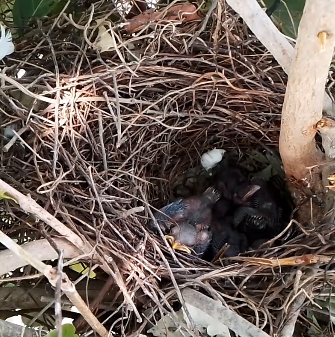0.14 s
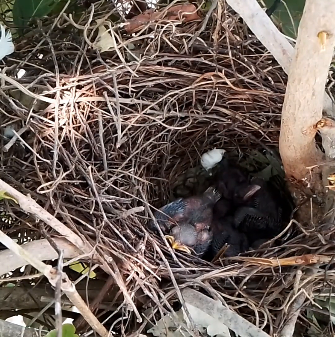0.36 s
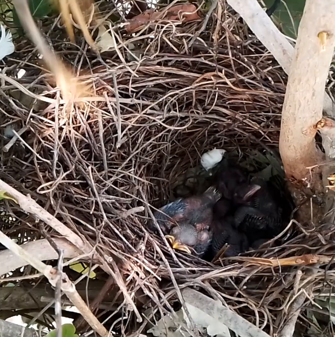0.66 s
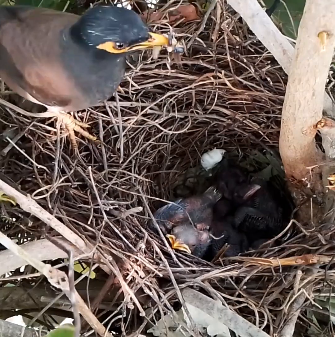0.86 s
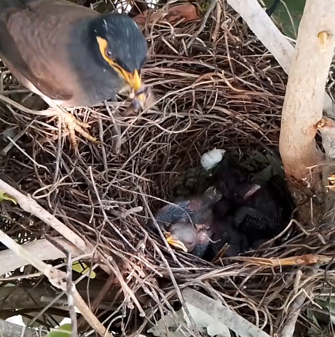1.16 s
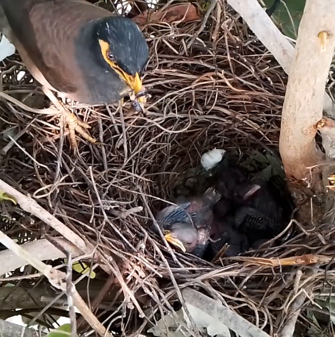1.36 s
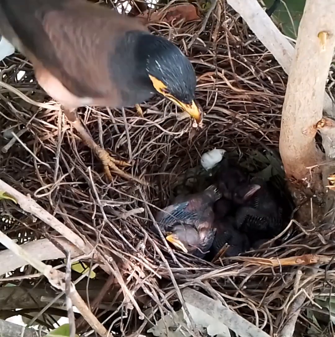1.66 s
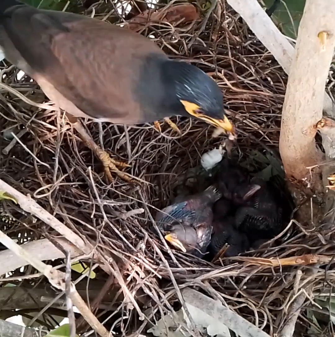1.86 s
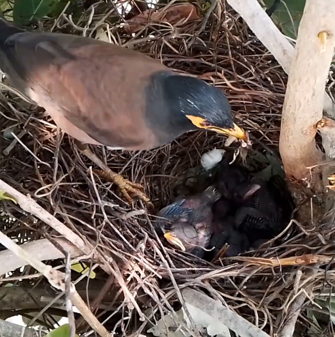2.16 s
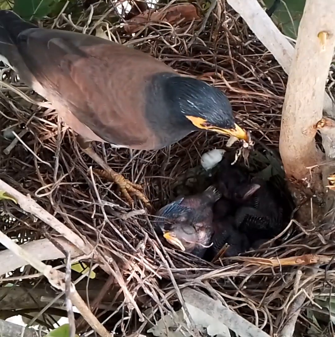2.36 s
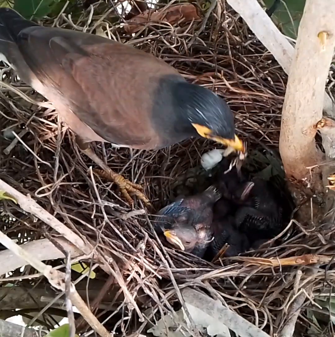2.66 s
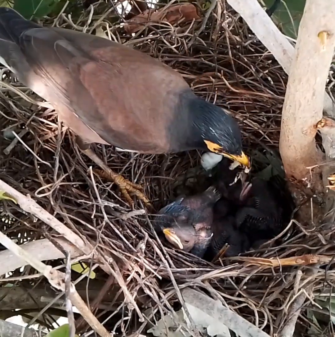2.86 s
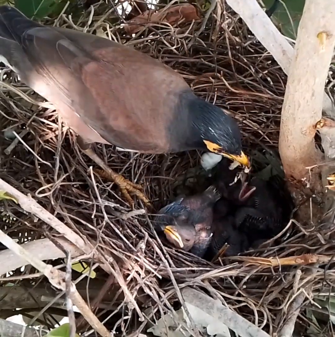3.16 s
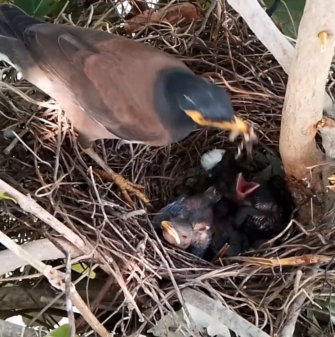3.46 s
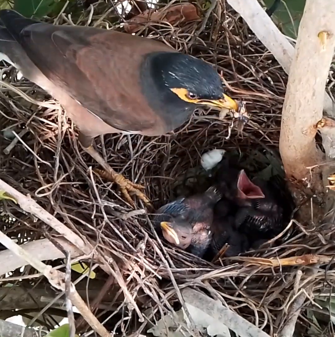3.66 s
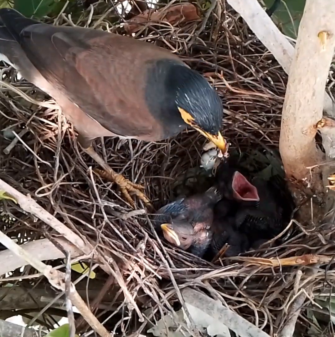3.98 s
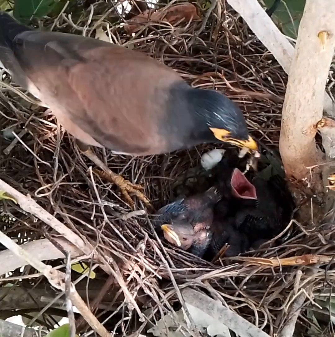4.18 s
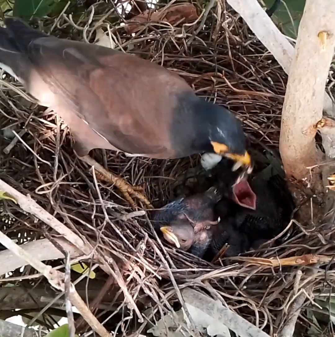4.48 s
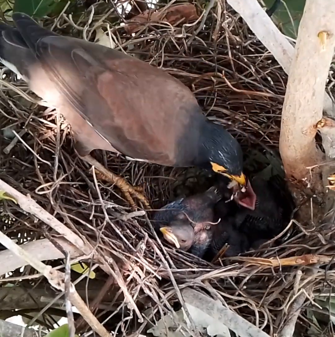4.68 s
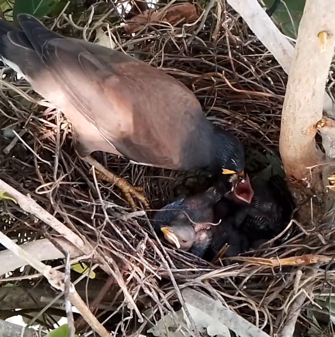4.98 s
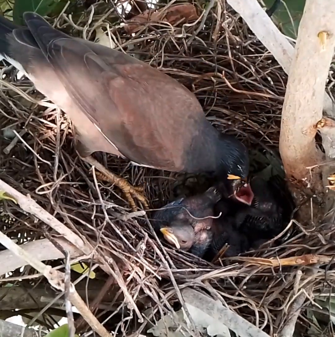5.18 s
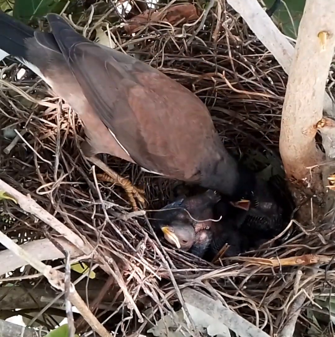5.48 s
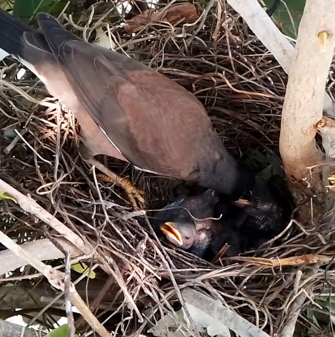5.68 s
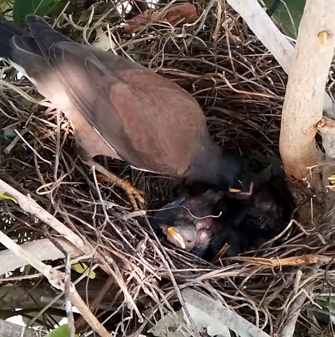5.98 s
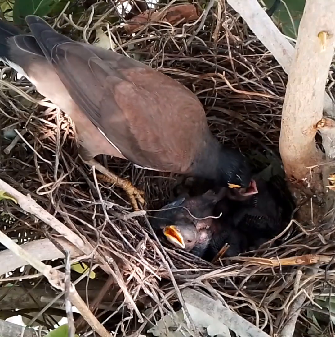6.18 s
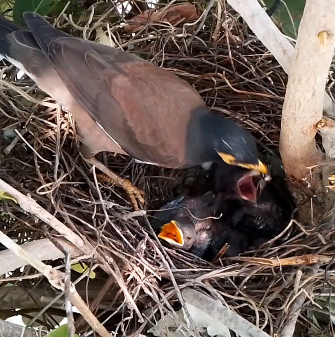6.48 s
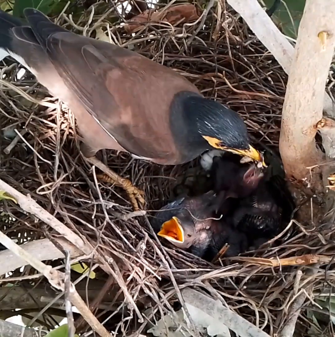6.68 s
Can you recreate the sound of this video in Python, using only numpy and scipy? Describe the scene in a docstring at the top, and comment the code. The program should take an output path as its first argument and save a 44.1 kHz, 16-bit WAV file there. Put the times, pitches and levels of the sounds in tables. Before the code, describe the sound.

Harsh bird squawks and a short whine, quick high peeps, then loud raspy begging from chicks in a twig nest over quiet outdoor air.

```python
"""A low churr dies away and a twig knocks as a myna lands on its nest with food; falling squawks follow.
Nestlings peep in twin falling whistles and beg in rasps: uneven pulses ringing a moving throat resonance.
Adults whine in harmonics and chip in down-sweeps. Twigs ring damped modes and brush in bursts of noise.
A rooster crows faintly, as harmonics through a throat, over a wash of coloured noise."""
import sys
import numpy as np
from scipy import signal
from scipy.fft import rfft, irfft, next_fast_len
from scipy.io import wavfile
from scipy.ndimage import uniform_filter1d

SR = 44100
rng = np.random.default_rng(int(sys.argv[2]) if len(sys.argv) > 2 else 0)


def transcribe(u):
    """Save the signal u as a 16-bit wav file named by the first command-line argument.

    u: samples, shape (n,) or (channels, n), limited to [-1, 1]; the rate is SR.
    q: integer samples, one column per channel.
    """
    v = np.clip(np.atleast_2d(u).T, -1, 1)
    q = np.round(v * 32767).astype(np.int16)
    wavfile.write(sys.argv[1], SR, q)


N = 301203
TIME = np.arange(N) / SR


def from_db(db):
    """Amplitude ratio of a level in dB."""
    return 10 ** (np.asarray(db) / 20)


def rms_one(x):
    """Scale to unit RMS."""
    return x / np.sqrt(np.mean(np.abs(x) ** 2) + 1e-20)


def at_hz(points, hz):
    """Gain of a spectrum table at any frequency, interpolated in dB over log frequency."""
    f, db = np.transpose(points)
    return from_db(np.interp(np.log(hz + 1), np.log(f), db))


def colour(x, points, skirt_db=30):
    """Filter by a spectrum table that falls by skirt_db an octave beyond its ends."""
    low_hz, low_db = points[0]
    high_hz, high_db = points[-1]
    closed = [(low_hz / 2, low_db - skirt_db), *points, (high_hz * 2, high_db - skirt_db)]
    length = x.shape[-1]
    size = next_fast_len(length + 512)
    gains = at_hz(closed, np.arange(size // 2 + 1) * SR / size)
    return irfft(rfft(x, size) * gains, size)[..., :length]


def low_pass(x, hz):
    """Second-order Butterworth low-pass."""
    sos = signal.butter(2, min(hz, SR / 3), fs=SR, output="sos")
    return signal.sosfilt(sos, x + 1e-18)


def waver(size, hz):
    """Random motion up to a given rate, spread 1."""
    return rms_one(low_pass(rng.standard_normal(size + 4096), hz)[-size:])


def follow(rows):
    """Start time, a 6 ms fade at both ends, and every column sample by sample."""
    s, *columns = np.transpose(rows)
    t = np.arange(s[0], s[-1], 1 / SR)
    fade = np.clip(np.minimum(t - t[0], t[-1] - t) / .006, 0, 1)
    return (s[0], fade, *[np.interp(t, s, c) for c in columns])


def place(start, x):
    """Put a sound on the scene's time line."""
    lead = np.zeros(max(int(start * SR), 0))
    return np.concatenate([lead, x, np.zeros(N)])[:N]


def turn(hz):
    """Phase in radians of a moving pitch."""
    return 2 * np.pi * np.cumsum(hz) / SR


SWELL_DEPTH_DB, SWELL_POWER = 25, 1.9


def swell(start, attack, release, peak_db, from_hz, to_hz, *held, count=12):
    """One arch of effort with a steady glide, as rows (s, dB, Hz, any held values)."""
    arch = np.linspace(-1, 1, 2 * count + 1)
    t = attack + arch * np.where(arch < 0, attack, release)
    db = peak_db - SWELL_DEPTH_DB * np.abs(arch) ** SWELL_POWER
    hz = from_hz * (to_hz / from_hz) ** (t / (attack + release))
    return [(*point, *held) for point in zip(start + t, db, hz)]


def rasp(rows, tone, pulse_hz, width_hz, rattle_db, hiss, gain_db,
         slowing=.3, jitter=.25, uneven_db=1.0, closing_db=0):
    """Uneven syrinx pulses, slower as effort drops, ring a moving throat resonance and a broad rattle."""
    start, fade, db, throat_hz = follow(rows)
    size = len(db)
    effort = from_db(slowing * (db - db.max()))
    rate_hz = pulse_hz * effort * np.exp(jitter * waver(size, 200))
    snaps = np.diff(np.floor(np.cumsum(rate_hz) / SR), prepend=0)
    snaps = snaps * from_db(uneven_db * rng.standard_normal(size)) * np.sqrt(SR / rate_hz)
    # a hissy start, a creaky end
    drive = snaps + hiss * np.linspace(1, 0, size) * rng.standard_normal(size)

    scattered = drive * np.exp(2j * np.pi * rng.random(size))
    throat = rms_one(low_pass(low_pass(scattered, width_hz / 2), width_hz))
    ring = np.sqrt(2) * np.real(throat * np.exp(1j * turn(throat_hz)))

    puffs = np.sqrt(np.abs(low_pass(drive ** 2, 620))) * rng.standard_normal(size)
    # positive closing_db: the rattle fades as the beak closes
    gape_db = rattle_db + closing_db * np.linspace(.5, -.5, size)
    voice = ring + from_db(gape_db) * rms_one(colour(puffs, tone))
    voice = voice / np.sqrt(uniform_filter1d(voice ** 2, size=800) + 1e-6)   # level out before the envelope
    return place(start, voice * fade * from_db(db + gain_db))


def chirps(rows, rough, flutter_hz, bend, rise):
    """Whistles that drop fast and level out, with a fluttering pitch and an octave overtone."""
    out = 0
    for start, length, from_hz, to_hz, db, octave_db in rows:
        u = np.linspace(0, 1, int(length * SR))
        drop_hz = from_hz - to_hz
        pitch = to_hz + drop_hz * (1 - u) ** bend
        phase = turn(pitch + rough * drop_hz * waver(len(u), flutter_hz))
        envelope = np.minimum(u / rise, 1) * np.sqrt(1 - u)
        envelope = envelope * from_db(4.34 * waver(len(u), 270))
        tone = np.sin(phase) + from_db(octave_db) * np.sin(2 * phase)
        out = out + place(start, from_db(db) * envelope * tone)
    return out


def call(rows, throat, gain_db, shake=0.137, shimmer_db=7, count=14):
    """A harmonic voice through a throat; roughness shakes its pitch and strength."""
    start, fade, db, hz, rough = follow(rows)
    size = len(hz)
    phase = turn(hz * (1 + shake * rough * waver(size, 446)))
    orders = np.arange(1, count + 1)[:, None]
    gains = at_hz(throat, orders * hz)
    voice = np.sum(gains * np.sin(orders * phase), axis=0)
    voice = voice / np.sqrt(np.sum(gains ** 2, axis=0) / 2)
    shimmer = shimmer_db * rough * (waver(size, 340) - rough / 2)
    return place(start, voice * fade * from_db(db + gain_db + shimmer))


def yard(x, early_db, tail_db, t60, scatter_s=0.003, pan_db=0, lag_size=0):
    """Direct sound, quick scatter from the branches and a tail from the walls, different at each port."""
    t = TIME[:32768]
    early, tail = rng.standard_normal((2, 2, len(t)))
    early = early * np.exp(-t / scatter_s)
    tail = tail * np.minimum(t / 0.033, 1) * from_db(-60 * t / t60)
    echoes = from_db(early_db) * rms_one(early) + from_db(tail_db) * rms_one(tail)
    echoes = echoes / np.sqrt(len(t))
    direct = np.array([np.roll(x, lag_size), x])   # lag in samples, left port
    heard = direct + signal.fftconvolve(x[None], echoes, axes=1)[:, :N]
    pan = from_db(np.array([[pan_db], [-pan_db]]) / 2)
    return heard * pan / np.hypot(1, from_db(early_db) / 2)


# Begging rasps. Each row: time in s, level in dB before the voice gain, throat resonance in Hz.
# The resonance climbs as the beak opens; the third rasp then sinks and slows.
BEG_1 = [(3.18, -62, 4930), (3.255, -46.5, 5120), (3.31, -49.5, 6200), (3.4, -39.5, 7370), (3.6, -40, 7310),
         (3.66, -43, 7700), (3.735, -55.5, 6980)]
BEG_2 = [(5.445, -68, 2494), (5.52, -51.5, 2400), (5.6, -44, 3295), (5.77, -52.5, 2890),
         (5.83, -66.5, 2186)]
BEG_3 = [(6.05, -62, 4600), (6.11, -44, 4994), (6.17, -38.5, 6190), (6.24, -37, 6490), (6.295, -35.5, 7470),
         (6.35, -45, 7410), (6.475, -41.5, 6900), (6.585, -52.5, 5320), (6.625, -63, 5060)]
# Rattle spectra of the three rasps. Each row: frequency in Hz, gain in dB.
BEG_1_TONE = [(1500, -28), (2000, -28.5), (2700, -9), (4100, -13), (5050, -4.5), (5800, -20), (7700, 4),
              (9100, -11), (10800, 0), (11500, -19), (12400, -37), (15000, -13)]
BEG_2_TONE = [(1200, -18.5), (1750, -22), (2200, -2.5), (2900, -4), (4500, 2), (5200, 4), (5800, -5),
              (6600, 2), (7400, -15.5), (8600, -11), (9600, -20), (12500, -25.5), (14300, -5), (15500, -26)]
BEG_3_TONE = [(1300, -16), (1900, -13), (2700, 1), (3600, 2), (4500, -1), (5600, 7.5), (8000, -14),
              (9500, -10), (11400, -6), (12800, -10), (15500, -13)]
# Right-channel tone of the begging: thinner near 5 kHz, brighter at 11 kHz.
# Each row: frequency in Hz, gain in dB.
RIGHT_BEG_TONE = [(3000, 0), (5100, -9), (6600, 0), (8500, -3.5), (11000, 4)]


def begging():
    """Two nestling rasps from deep in the cup, then one with the beak raised, slowing to a creak."""
    deep = rasp(BEG_1, BEG_1_TONE, pulse_hz=514.0, width_hz=3020, rattle_db=1, hiss=1.0, gain_db=-2.5)
    deep = deep + rasp(BEG_2, BEG_2_TONE, pulse_hz=359, width_hz=990, rattle_db=5.5, hiss=1.0,
                       gain_db=-2, uneven_db=0, closing_db=0.5)
    raised = rasp(BEG_3, BEG_3_TONE, pulse_hz=640, width_hz=1480, rattle_db=-13, hiss=0.75,
                  gain_db=1.5, slowing=0.38, jitter=0.3, uneven_db=3, closing_db=17.5)
    deep = yard(deep, early_db=1.5, tail_db=-8.0, t60=0.52, scatter_s=0.0036, pan_db=-1)
    raised = yard(raised, early_db=-3.5, tail_db=-12, t60=0.49, scatter_s=0.003, pan_db=-3.0)
    left, right = deep + raised
    return np.array([left, colour(right, RIGHT_BEG_TONE, skirt_db=3)])


# Nestling peeps in a steady rhythm.
# Each row: start in s, high voice level in dB, low voice level in dB, low voice start pitch in Hz.
PEEPS = [(2.814, -57, -66.5, 5110), (2.995, -50, -55, 5365), (3.177, -50.5, -53.5, 5500),
         (3.352, -49.5, -45.5, 5654), (3.536, -43.5, -47, 5680), (3.724, -47, -46.5, 5715)]
# a fall is a share of the starting pitch
HIGH_VOICE_HZ, HIGH_VOICE_S, HIGH_FALL, HIGH_OCTAVE_DB = 6834, 0.075, 0.085, -15.5
LOW_VOICE_LAG_S, LOW_VOICE_S, LOW_FALL, LOW_OCTAVE_DB = 0.019, 0.072, 0.125, 3


def peeps():
    """Each peep is two hoarse falling whistles; the later, low one carries a strong octave."""
    high_end_hz = HIGH_VOICE_HZ * (1 - HIGH_FALL)
    high = [(s, HIGH_VOICE_S, HIGH_VOICE_HZ, high_end_hz, db, HIGH_OCTAVE_DB) for s, db, _, _ in PEEPS]
    low = [(s + LOW_VOICE_LAG_S, LOW_VOICE_S, hz, hz * (1 - LOW_FALL), db, LOW_OCTAVE_DB)
           for s, _, db, hz in PEEPS]
    return (chirps(high, rough=0.29, flutter_hz=950, bend=2.23, rise=0.2)
            + chirps(low, rough=0.16, flutter_hz=950, bend=2.0, rise=0.13))


# Falling squawks of two adults. Each row: start in s, attack in s, release in s,
# peak in dB before the voice gain, start and end resonance in Hz, pulses per s at full effort, caller.
SQUAWKS = [(0.253, 0.08, 0.092, -36, 5787, 2907, 250, "near"),
           (1.08, 0.148, 0.1, -49, 5486, 3106, 282, "far"),
           (4.06, 0.083, 0.066, -35.5, 5710, 3330, 300, "near")]
# whistle at the peak of each squawk
CORE_LEAD_S, CORE_S, CORE_FROM_HZ, CORE_TO_HZ, CORE_OCTAVE_DB = 0.02, 0.0554, 4100, 3856, -21


def squawks(caller, tone, gain_db, **voice):
    """Harsh calls: the resonance slides down as the beak closes, locking briefly into a whistle."""
    out = 0
    for start, attack, release, db, from_hz, to_hz, pulse_hz, who in SQUAWKS:
        if who == caller:
            rows = swell(start, attack, release, db, from_hz, to_hz)
            out = out + rasp(rows, tone, pulse_hz, gain_db=gain_db, **voice)
            core_start = start + attack - CORE_LEAD_S
            core = (core_start, CORE_S, CORE_FROM_HZ, CORE_TO_HZ, db + gain_db, CORE_OCTAVE_DB)
            out = out + chirps([core], rough=0.53, flutter_hz=800, bend=1.49, rise=0.35)
    return out


# Low churr, already dying away at the start: a negative attack puts its peak before time zero.
# One row: start in s, attack in s, release in s, peak in dB before the voice gain, start and end Hz.
CHURR = (0.0, -0.094, 0.147, -39, 2956, 2845)
# Rattle spectra of churr and near squawk. Each row: frequency in Hz, gain in dB.
CHURR_TONE = [(880, -65), (1500, -40), (2140, -21), (2350, -26), (2530, -6), (2940, 1.5), (3540, -15),
              (6270, -18), (6630, -21), (8140, -6.5), (9370, -42), (10900, -11), (14000, -62)]
SQUAWK_TONE = [(2000, -35), (2700, -34), (3600, -7), (4600, -1), (6000, 6.5), (6900, -11.5), (8000, -5),
               (9300, -12), (10300, -8), (11600, 2), (13000, -16), (14200, -13)]


def near_adult():
    """A pulsed churr dying away, then the near adult's bright rasping squawks."""
    churr = rasp(swell(*CHURR), CHURR_TONE, pulse_hz=299.3, width_hz=1200, rattle_db=6, hiss=1.0, gain_db=3.0)
    return churr + squawks("near", SQUAWK_TONE, width_hz=840, rattle_db=1.0, hiss=0.81,
                           gain_db=-3.0, closing_db=43)


# Rattle spectrum of the far squawk. Each row: frequency in Hz, gain in dB.
SCOLD_TONE = [(2000, -44), (2800, -23), (3800, -3), (5000, 3), (6100, -9), (7900, -14), (9300, -8),
              (11300, -11), (14000, -35)]


def far_adult():
    """The far adult's squawk, a pulsed rasp with its own rattle."""
    return squawks("far", SCOLD_TONE, width_hz=1120, rattle_db=-7, hiss=.8, gain_db=-6, closing_db=43)


# Clear calls breaking from a low growl up into a whine.
# Each row: time in s, level in dB before the voice gain, pitch in Hz, roughness 0-1.
CALL_1 = [(2.035, -60, 479, 0.69), (2.075, -57.5, 610.3, 0.44), (2.125, -57.5, 572.4, 0.17),
          (2.147, -46, 871, 0.41), (2.17, -48, 873, 0.04), (2.2, -49.5, 1047, 0.11),
          (2.25, -54.5, 1034, 0.01), (2.28, -67, 983, 0)]
CALL_2 = [(4.045, -76.5, 401.8, 0.38), (4.115, -60, 388, 0.28), (4.128, -59.5, 744.5, 0.62),
          (4.16, -54.5, 556, 0.16), (4.175, -50, 987, 0.12), (4.192, -49, 995, 0.16),
          (4.213, -48.5, 841, 0.12), (4.24, -53.5, 1086, 0.13), (4.348, -53.5, 1145, 0.16),
          (4.39, -60.5, 967, 0.12)]
# Throat spectrum. Each row: frequency in Hz, gain in dB.
CALL_THROAT = [(400, -14.5), (700, -11.5), (1050, -12), (1400, -5.5), (1750, -0.5), (2200, -6), (2700, -11),
               (3300, -19.5), (4100, -30), (5200, -33), (9000, -28.5)]
# Second side of the syrinx. Each row: start in s, attack in s, release in s,
# peak in dB before the voice gain, start and end pitch in Hz, roughness 0-1.
SECOND_VOICE = [(2.175, 0.0344, 0.062, -40, 2500, 2170, 0.17), (2.4, 0.029, 0.117, -45.5, 2100, 1750, 0.1),
                (2.31, 0.0544, 0.04, -49.5, 2200, 3200, 0.3), (4.19, 0.0885, 0.0606, -39, 2650, 2920, 0.49)]
# Gritty rasps that open and close a call. Each row: start in s, attack in s, release in s,
# peak in dB before the voice gain, start and end resonance in Hz.
CALL_GRIT = [(2.03, 0.081, 0.065, -49.5, 2130, 1400), (2.241, 0.08, 0.085, -54.5, 2100, 2860)]
# Rattle spectrum of the grit. Each row: frequency in Hz, gain in dB.
GRIT_TONE = [(900, -20), (1300, -14), (2300, -3), (3100, 0), (4100, -6), (4800, -21), (7000, -14.5)]


def clear_calls():
    """Harmonic adult whines, with the second voice and the grit that go with them."""
    voice = call(CALL_1, CALL_THROAT, gain_db=-0.5) + call(CALL_2, CALL_THROAT, gain_db=0)
    second = sum(call(swell(*note), CALL_THROAT, gain_db=-9.5, count=1) for note in SECOND_VOICE)
    grit = sum(rasp(swell(*note), GRIT_TONE, pulse_hz=387, width_hz=660, rattle_db=0.5, hiss=1.0,
                    gain_db=-3.5) for note in CALL_GRIT)
    return voice + second + grit


# Short adult chips. Each row: start in s, length in s, level in dB.
CHIPS = [(0.717, 0.076, -62.5), (1.607, 0.077, -57), (2.487, 0.054, -56.5), (2.868, 0.058, -62.5),
         (2.946, 0.059, -52), (3.362, 0.042, -50.5), (3.805, 0.044, -51), (4.682, 0.08, -59.5),
         (5.106, 0.08, -61), (6.004, 0.052, -57.5), (6.467, 0.039, -49.5)]
CHIP_FROM_HZ, CHIP_TO_HZ, CHIP_OCTAVE_DB = 4050, 2628, -15


def chips():
    """An adult's quick rough whistles, all on the same downward sweep."""
    rows = [(s, length, CHIP_FROM_HZ, CHIP_TO_HZ, db, CHIP_OCTAVE_DB) for s, length, db in CHIPS]
    return chirps(rows, rough=0.19, flutter_hz=1070, bend=1.7, rise=0.093)


# Faint whistles. Each row: start in s, length in s, start pitch in Hz, level in dB.
WHISTLES = [(0.485, 0.068, 2230, -72.5), (0.91, 0.035, 2280, -76), (1.878, 0.15, 7350, -61.5),
            (2.1, 0.2, 7960, -73), (2.239, 0.064, 7760, -60.5), (2.443, 0.12, 7420, -72.5),
            (4.382, 0.127, 2138, -70.5), (5.8, 0.112, 2160, -75), (6.628, 0.1, 2140, -73.5)]
WHISTLE_FALL, WHISTLE_OCTAVE_DB = 0.035, -26   # fall is a share of the starting pitch


def whistles():
    """Thin, nearly level notes that barely sink."""
    rows = [(s, length, hz, hz * (1 - WHISTLE_FALL), db, WHISTLE_OCTAVE_DB) for s, length, hz, db in WHISTLES]
    return chirps(rows, rough=0.43, flutter_hz=600, bend=1.44, rise=0.22)


# Firmer steps on the nest. Each row: time in s, level in dB before knock_db.
KNOCKS = [(0.135, -53.5), (2.649, -61.5), (3.031, -59), (3.089, -61), (3.454, -60), (4.349, -59),
          (4.732, -56.5), (6.107, -65), (6.216, -52.5), (6.248, -51), (6.543, -57), (6.692, -60)]
# Modes of the twig bowl. Each row: frequency in Hz, level in dB, 60 dB decay time in s.
NEST_MODES = [(83.5, -34, 0.29), (247, -4.5, 0.038), (304, -1, 0.021), (391, -4, 0.023)]
# Creaking, stronger once the parent leans in to feed. Each row: time in s, level in dB before creak_db.
SHUFFLE = [(0, -70.5), (0.3, -78.5), (3.0, -80), (5.85, -78), (5.98, -66), (6.46, -68), (6.82, -63)]
# Path through the branch to the microphone. Each row: frequency in Hz, gain in dB.
BRANCH_PATH = [(40, -8), (95, 0), (165, -15), (230, 1), (330, 1.5), (480, -3), (800, 3), (1600, -13)]


def nest_knocks(knock_db, creak_db, creaks_per_s):
    """Steps and small random slips ring the dull modes of the twig bowl, heard through the branch."""
    steps = np.zeros(N)
    for s, db in KNOCKS:
        steps[int((s + .003) * SR)] = from_db(db + knock_db)
    slips = (rng.random(N) < creaks_per_s / SR) * rng.standard_normal(N)
    t = TIME[:4096]
    bowl = sum(from_db(db - 60 * t / t60) * np.sin(2 * np.pi * hz * t) for hz, db, t60 in NEST_MODES)
    shuffle_db = np.interp(TIME, *np.transpose(SHUFFLE)) + creak_db
    creaks = rms_one(signal.fftconvolve(slips, bowl)[:N]) * from_db(shuffle_db)
    knocks = signal.fftconvolve(steps, bowl)[:N]
    return colour(knocks + creaks, BRANCH_PATH)


# Twig snaps and feather brushes. Each row: start in s, level in dB, decay time constant in s.
BRUSHES = [(0.57, -53, 0.023), (0.59, -52, 0.016), (0.68, -62, 0.094), (1.038, -64, 0.0047),
           (1.501, -53.5, 0.0031), (2.962, -58.5, 0.0083)]
# Scrape spectrum. Each row: frequency in Hz, gain in dB.
BRUSH_TONE = [(1200, -70), (3500, -16.5), (6000, -14), (8000, -6.5), (9300, -8), (11000, 3.5), (13000, -8),
              (15500, -9)]


def brushes():
    """Claws and feathers on dry twigs: short decaying bursts of bright noise."""
    force = sum(place(s, from_db(db) * np.exp(-TIME[:16384] / decay)) for s, db, decay in BRUSHES)
    return force * rms_one(colour(rng.standard_normal(N), BRUSH_TONE))


# Syllables of the distant crow.
# Each row: start in s, attack in s, release in s, peak in dB before the voice gain, start pitch in Hz.
CROW = [(1.369, 0.042, 0.093, -66, 640), (1.469, 0.105, 0.063, -63.5, 621.3),
        (1.69, 0.073, 0.14, -67.5, 596), (1.8, 0.086, 0.22, -64.5, 610), (2.399, 0.095, 0.077, -63, 614.7),
        (2.52, 0.035, 0.12, -70, 596)]
# Rooster's throat spectrum. Each row: frequency in Hz, gain in dB.
CROW_THROAT = [(600, -27.5), (1200, -28.5), (1800, -10.5), (2400, -22), (3000, -15.5), (3700, -24),
               (5000, -29)]
CROW_SAG_HZ_PER_S, CROW_ROUGH = 119.4, 0.1


def crow():
    """A far rooster: five harmonics through a throat, each syllable swelling and sagging in pitch."""
    out = 0
    for s, attack, release, db, hz in CROW:
        end_hz = hz - CROW_SAG_HZ_PER_S * (attack + release)
        rows = swell(s, attack, release, db, hz, end_hz, CROW_ROUGH)
        out = out + call(rows, CROW_THROAT, gain_db=-1.5, count=5)
    return out


# Spectra of the outdoor wash and the treble hiss. Each row: frequency in Hz, gain in dB.
AIR = [(15, -17), (25, 3), (110, -3.5), (160, -24), (198, -26), (289, -10.5), (433, -17), (469, -9.5),
       (1110, -23), (1200, -19), (2120, -13), (2490, -18), (3630, -20.5), (7300, -10.5), (15500, -16.5)]
AIR_TREBLE = [(5500, -43), (6800, -26), (7700, 0.5), (9200, -6.5), (11000, -1.5), (12800, -36)]


def air(level_db, treble_db):
    """Quiet outdoor wash of partly shared noise, plus a separate treble hiss in each port."""
    left, right, shared = rng.standard_normal((3, N))
    wash = rms_one(colour(np.array([left, right]) + .5 * shared, AIR))
    wash = wash * from_db(level_db + .5 * waver(N, 21))
    treble = rms_one(colour(rng.standard_normal((2, N)), AIR_TREBLE))
    return wash + from_db(treble_db) * treble


def scene():
    """Nestlings, adults, nest and distant crow, each with its own echoes, over dry air noise."""
    knocks = nest_knocks(knock_db=5.5, creak_db=0.5, creaks_per_s=110)
    return (begging()
            + yard(peeps(), early_db=4.5, tail_db=3.5, t60=0.36, pan_db=1.5)
            + yard(near_adult(), early_db=4.5, tail_db=-1.0, t60=0.45, scatter_s=0.0075, pan_db=-2.5)
            + yard(far_adult(), early_db=9.0, tail_db=4.5, t60=0.45, pan_db=1.5)
            + yard(clear_calls(), early_db=-5.0, tail_db=-10.5, t60=0.32)
            + yard(chips(), early_db=0.5, tail_db=2, t60=0.56, scatter_s=0.011, lag_size=-19)
            + yard(whistles(), early_db=-2, tail_db=-0.5, t60=0.29, pan_db=2.5)
            + yard(knocks, early_db=-3.5, tail_db=-12.0, t60=0.36, scatter_s=0.012, pan_db=-4.5, lag_size=25)
            + yard(brushes(), early_db=0.5, tail_db=-2.0, t60=0.33)
            + yard(crow(), early_db=-2.5, tail_db=-1, t60=0.48, lag_size=-20)
            + air(level_db=-69.5, treble_db=-74.5))


# Resonances of the two microphone ports. Each row: frequency in Hz, gain in dB.
LEFT_PORT = [(110, 0), (165, 5.5), (220, -4), (330, 0.5), (700, 0.5), (3000, 4.5), (5000, 4), (6300, 0.5),
             (7600, 7.5), (9000, -1), (10000, -13.5), (11300, -17), (13000, -10.5), (15500, -8)]
RIGHT_PORT = [(110, 6), (165, 7), (220, -1), (330, 0.5), (700, 0.5), (3000, 1), (5000, -4.5), (6300, -4),
              (7500, -11), (9000, -6), (10000, 2.5), (11300, 6.5), (13000, -2), (15500, -15)]
CUTOFF_HZ = 15750


def record(dry, self_noise_db=-75):
    """Each port colours its channel, the capsules add faint hiss; the top is cut."""
    left = colour(dry[0], LEFT_PORT, skirt_db=0.0)
    right = colour(dry[1], RIGHT_PORT, skirt_db=4.5)
    ports = np.array([left, right]) + from_db(self_noise_db) * rng.standard_normal((2, N))
    top_cut = signal.ellip(10, .2, 70, CUTOFF_HZ, fs=SR, output="sos")
    return signal.sosfilt(top_cut, ports)


dry = scene()
out = record(dry)
transcribe(out)
```